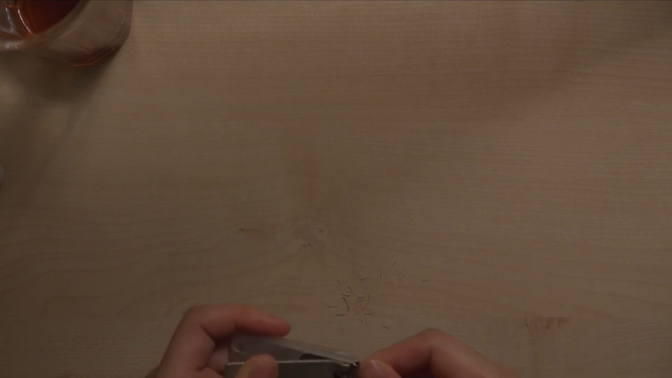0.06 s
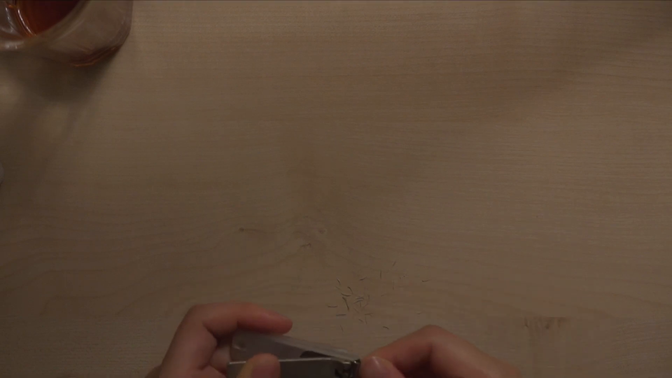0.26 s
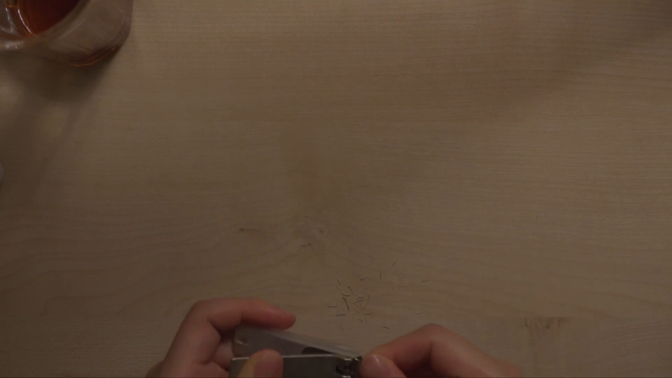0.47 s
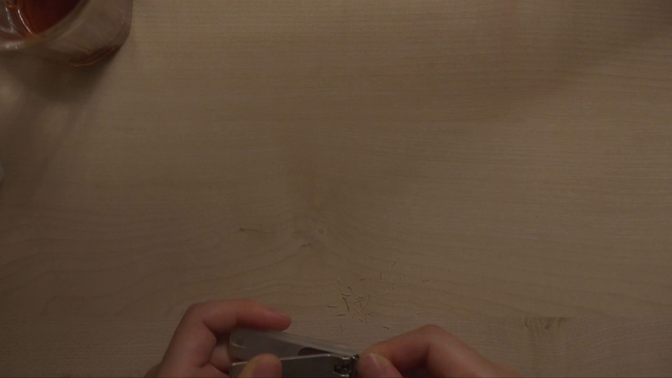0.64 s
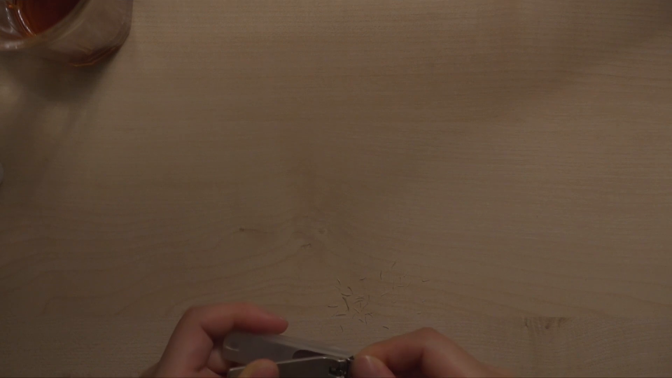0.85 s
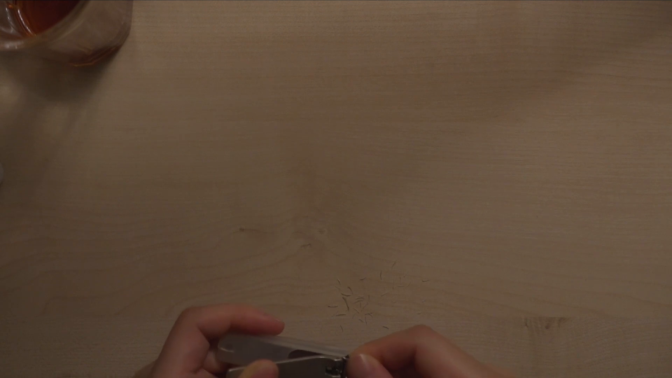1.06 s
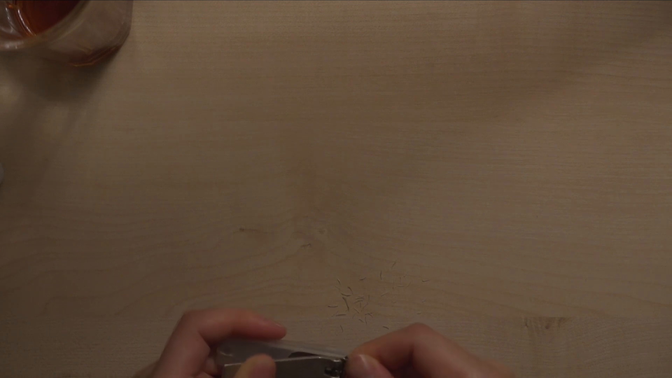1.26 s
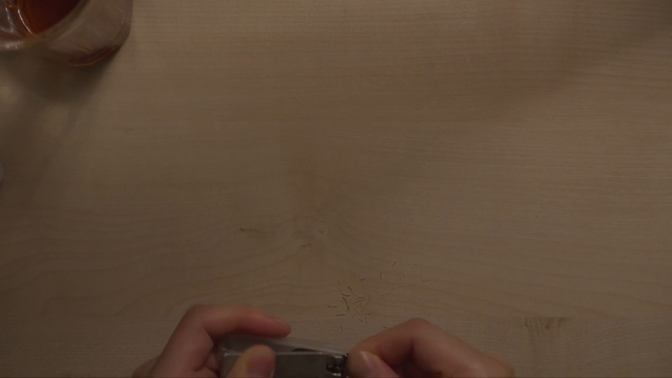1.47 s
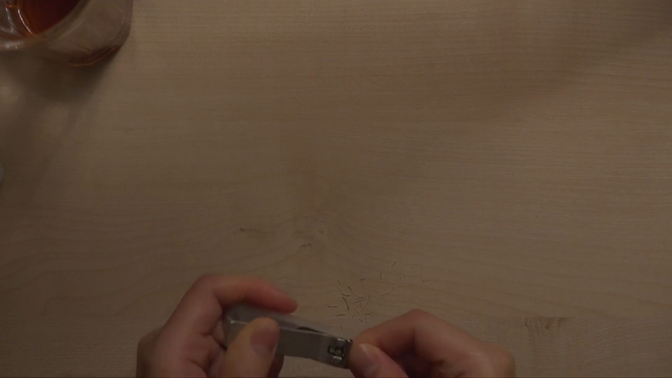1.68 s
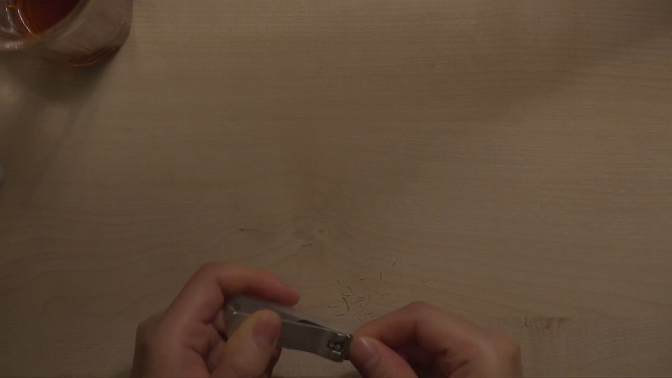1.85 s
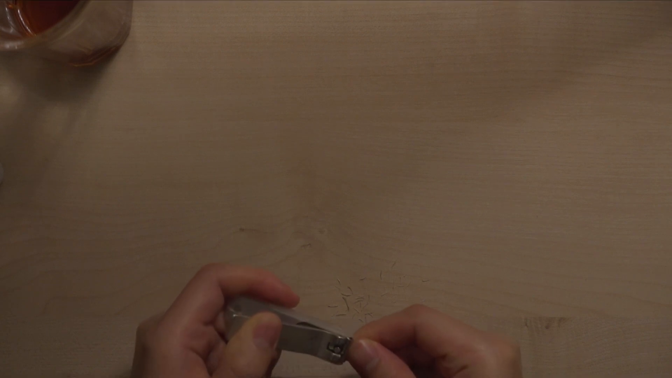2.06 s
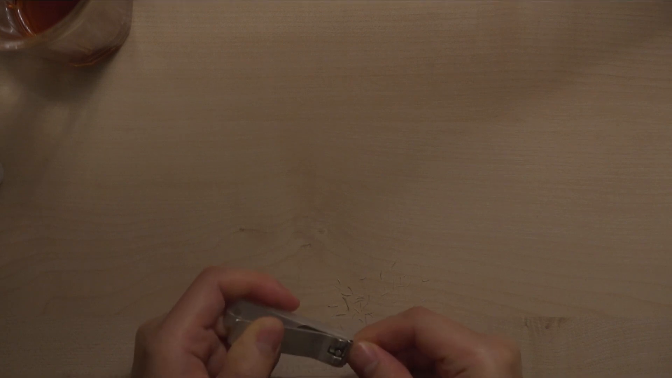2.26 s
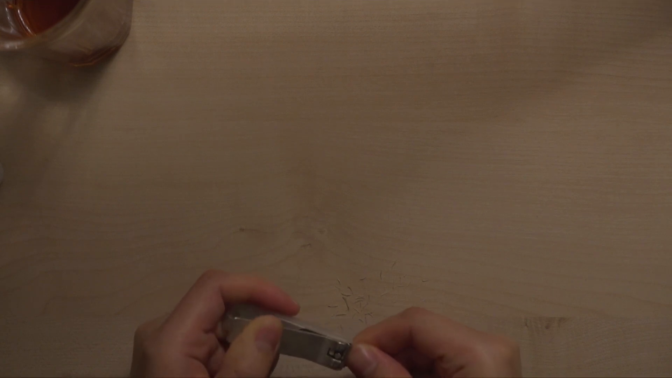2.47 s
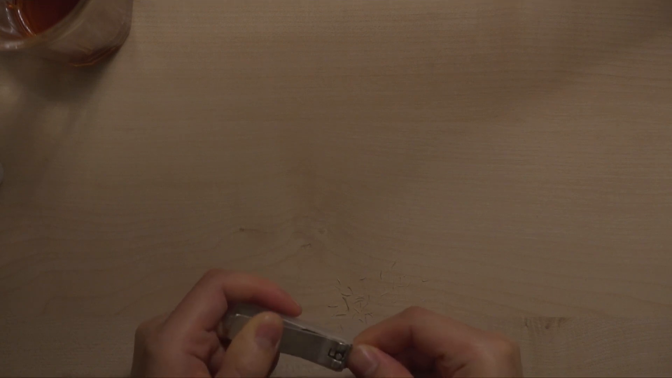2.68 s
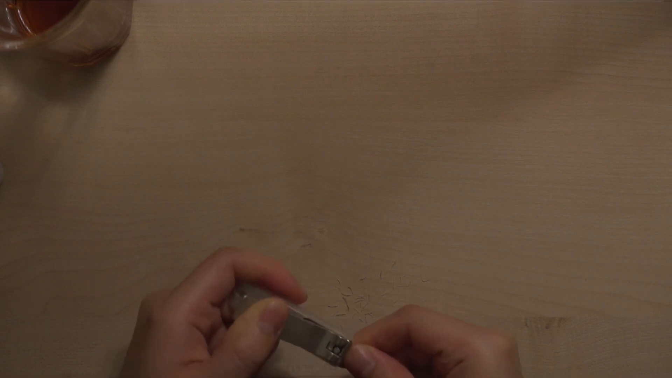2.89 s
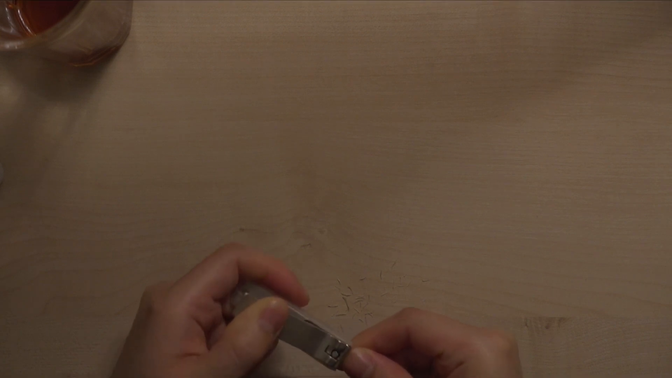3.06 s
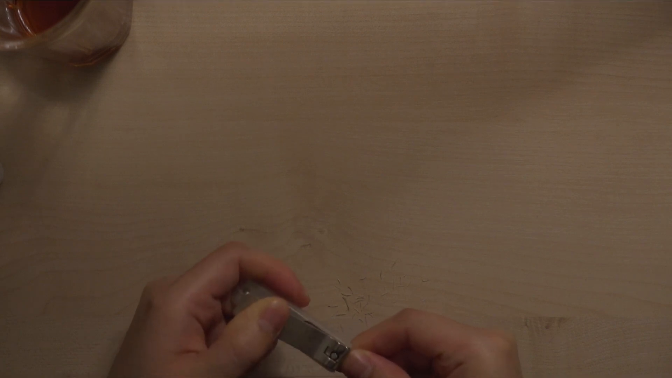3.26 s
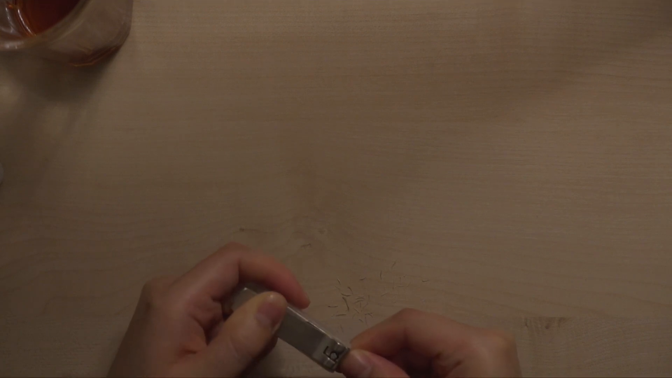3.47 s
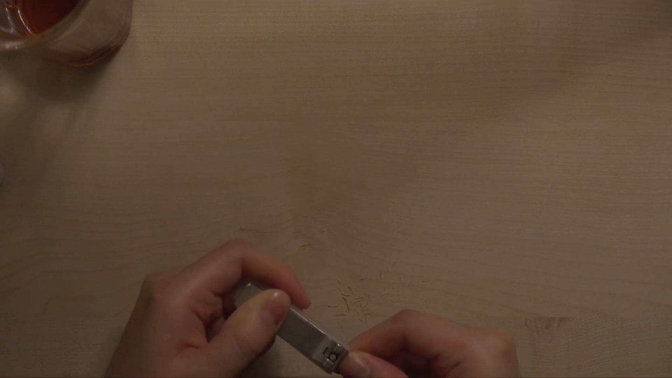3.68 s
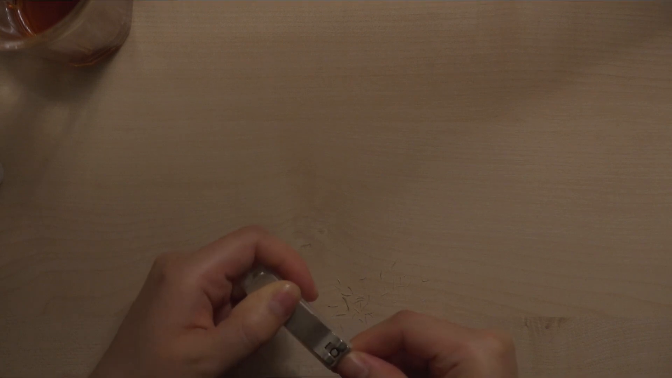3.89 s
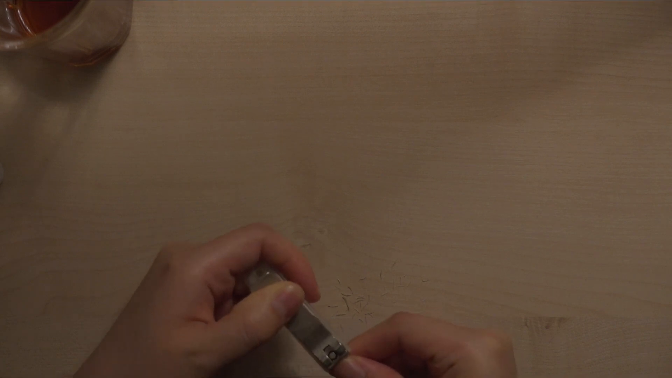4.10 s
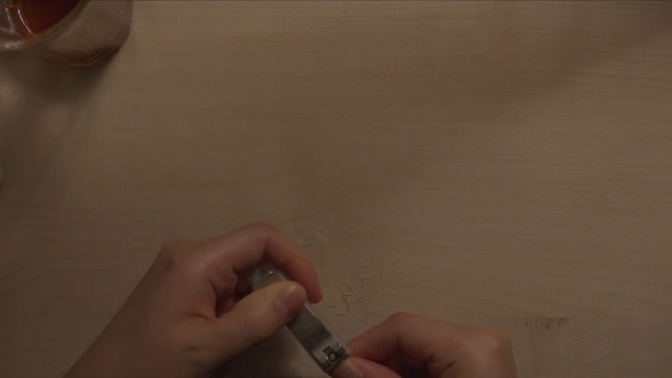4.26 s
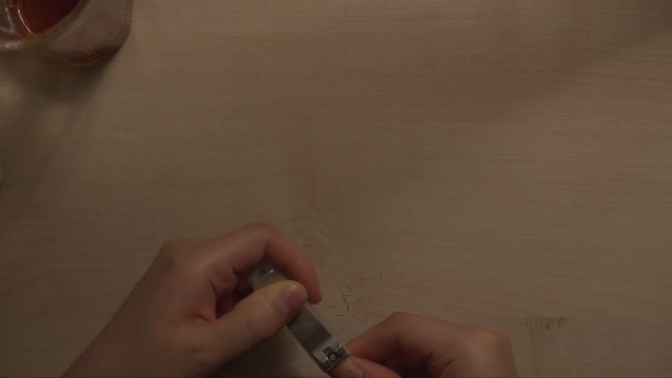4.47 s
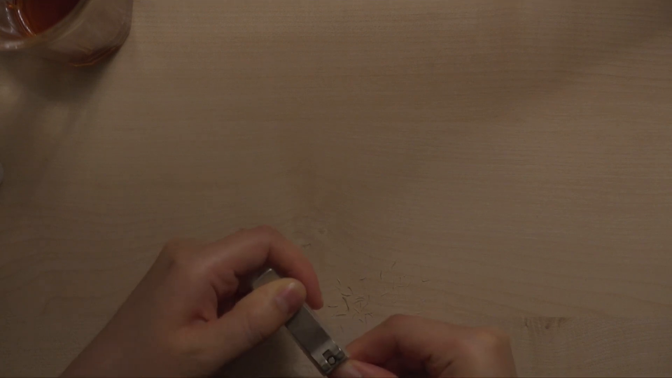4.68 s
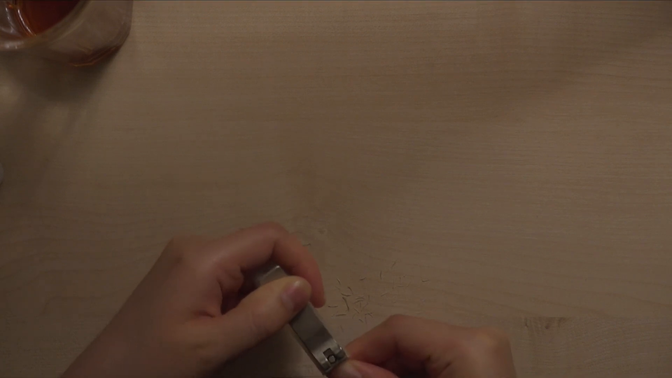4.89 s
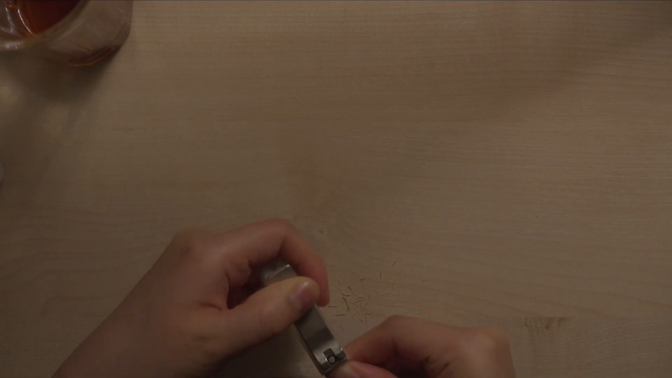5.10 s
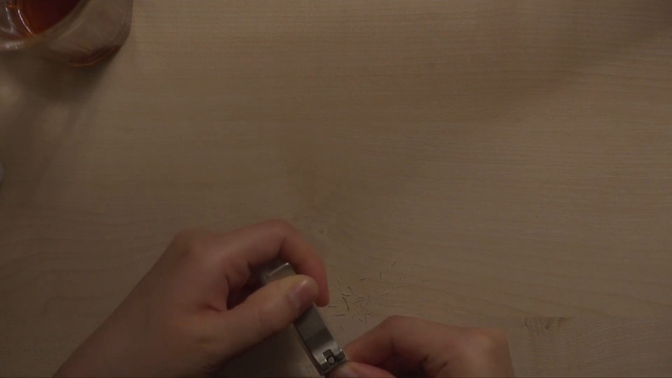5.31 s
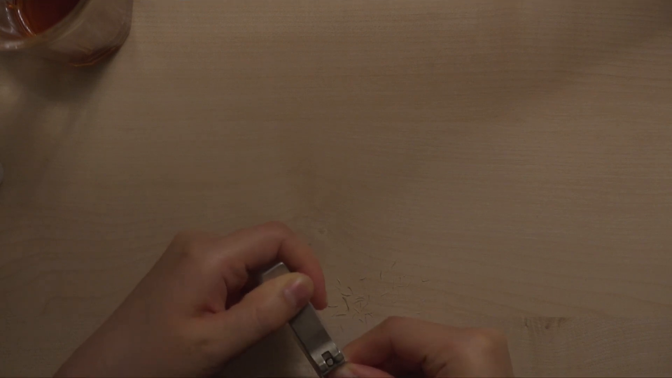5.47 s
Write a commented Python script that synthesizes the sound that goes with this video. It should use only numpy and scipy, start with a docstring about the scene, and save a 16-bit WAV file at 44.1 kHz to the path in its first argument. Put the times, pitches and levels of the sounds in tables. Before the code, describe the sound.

A steel nail clipper snaps four times, sharp and close, with a bright half-second room ring after each, over faint ventilation hush.

```python
"""A soft ventilation rush, third-octave noise bands with wavering levels, runs throughout.
Over it a steel nail clipper snaps four times, close by, above a wooden table, from 1.4 s to 4.7 s.
Faint lever ticks and jaw touches, ringing or bare clicks, fall between the snaps.
Each snap: a 2 ms crack, a click with splinter noise through the clipper's rings, plus a dull table knock; then
early echoes and diffuse reverberation, thickened from 11 ms by the hard walls, ringing for half a second.
The recorder's limiter ducks each crack, so the room seems to swell in after it."""
import sys
import numpy as np
from scipy import signal
from scipy.io import wavfile
from scipy.ndimage import uniform_filter1d, minimum_filter1d

SR = 44100
rng = np.random.default_rng(int(sys.argv[2]) if len(sys.argv) > 2 else 0)


def to_linear_factor(level_db):
    """Convert decibel levels (scalar or array-like) to linear amplitude factors."""
    exponent = np.asarray(level_db, float) / 20
    return 10 ** exponent


def output_pcm(signal):
    """Save a mono or channel-first signal as 16-bit PCM at the path in sys.argv[1].

    Samples are clipped to [-1, 1] before scaling.
    """
    pcm = np.clip(np.atleast_2d(signal).T, -1, 1) * 32767
    wavfile.write(sys.argv[1], SR, np.round(pcm).astype(np.int16))


N = 244314

# Ventilation spectrum, relative density: (frequency [Hz], level [dB])
RUSH_SPECTRUM = [(15, -70), (25, -32), (59, -26), (148, -24), (178, -21.5), (305, -7.5), (410, -1),
                 (552, -2.5), (666, -1.5), (919, -5), (1050, -6.5), (2300, -10), (3340, -14.5),
                 (14300, -22.5), (15500, -33)]
# Faint resonances of the rush: (frequency [Hz], nominal width [Hz], gain [dB])
RUSH_RESONANCES = [(660, 89, 1), (916, 39, 3.5), (1448, 47, 4), (2210, 320, 3.5)]
# Left-right correlation of the rush: (frequency [Hz], correlation [-1..1])
RUSH_CORRELATION = [(40, 0.92), (130, 0.76), (300, 0.9847), (640, 0.84), (1400, 0.23), (3100, 0.029),
                    (8000, 0.11)]
# Reverberation time of the room: (frequency [Hz], T60 [s])
ROOM_T60 = [(1000, 0.22), (2500, 0.63), (5000, 0.53), (8000, 0.53), (12000, 0.42), (16000, 0.38)]
# Left-right correlation of the reverberation: (frequency [Hz], correlation [-1..1])
ROOM_CORRELATION = [(1000, .85), (1500, .78), (2200, .45), (3100, .09), (6800, -.18), (12000, .05)]
# First echoes from table, ceiling and walls: (delay [s], level [dB], left-right difference [dB])
EARLY_ECHOES = [(.00055, -13, 0), (.0046, -29, 1), (.0109, -25.5, 0), (.0150, -29, -4), (.0192, -31, 2),
                (.0240, -31, 0)]
# Peaks and dips of the hand-damped clipper: (frequency [Hz], nominal width [Hz], gain [dB])
CLIPPER_RINGS = [(1920, 2100, -7), (2420, 770, 8), (3460, 4400, -2), (4674, 890, 12), (5240, 540, -4.5),
                 (6730, 2510, 13.5), (7350, 1180, -6.5), (12590, 6340, 8), (15500, 490, 1),
                 (15140, 620, 4.5)]
# Lever ticks: (time [s], level [dB])
LEVER_TICKS = [(1.8862, -54), (2.1172, -50)]
# Light contacts of jaws and nail: (time [s], click level before clipper colour [dB])
JAW_TOUCHES = [(2.1560, -55), (3.5601, -51)]
# Equally hard snaps: (time [s], table knock [dB], low ring [dB], high ring [dB], left-right difference [dB])
SNAP_EVENTS = [(1.4045, -11.5, 2.5, -0.5, 3.5), (2.5885, -12, -0.5, 2, -2), (3.5744, -20, -4.5, 2, 0),
               (4.7425, -6, -3, 1.5, -0.5)]

BAND_EDGES_HZ = 20 * 2 ** np.arange(0, 10, 1 / 3)
RUSH_DB = -63.5
DIFFUSE_DB, WALLS_DB = -38, -40.5  # before the clipper's colour and CRACK_GAIN_DB
WALLS_S, BUILD_S = .0108, .0015
TICK_HZ, TICK_WIDTH_HZ = 3250, 200
CRACK_GAIN_DB = 9
LEFT_LOUDER_DB = 0.84
HALF_SPLIT = np.array([[.5], [-.5]])  # shares a left-right difference in dB between the channels
TOP_HZ, CEILING_DB, RELEASE_S, LOOKAHEAD_S = 16120, -12.6, .019, .0006


def at_hz(points, hz):
    """Interpolates a spectrum table on a log-frequency axis."""
    table_hz, values = np.transpose(points)
    return np.interp(np.log(hz), np.log(table_hz), values)


def resonate(x, hz, width_hz):
    """Two-pole resonance, about unity gain at its peak."""
    r = np.exp(-np.pi * width_hz / SR)
    numerator = [(1 - r * r) / 2, 0, (r * r - 1) / 2]
    return signal.lfilter(numerator, [1, -2 * r * np.cos(2 * np.pi * hz / SR), r * r], x)


def colour(x, peaks):
    """Adds resonances in series: positive gain makes a peak, negative a dip."""
    for hz, width_hz, db in peaks:
        x = x + (to_linear_factor(db) - 1) * resonate(x, hz, width_hz * to_linear_factor(-db / 2))
    return x


def drift(rate_hz):
    """Slow random variation, spread 1: noise through two equal low-pass poles."""
    r = np.exp(-80 * np.pi * rate_hz / SR)  # computed at SR / 40
    noise = rng.standard_normal(N // 40 + 2002)
    slow = signal.lfilter([1], [1, -2 * r, r * r], noise)[2000:]  # start-up discarded
    return np.interp(np.arange(N) / 40, np.arange(len(slow)), slow / slow.std())


def diffuse_bands(correlation, size):
    """Yields third-octave stereo noise; the mid/side balance sets each band's correlation."""
    white = rng.standard_normal((2, 2, size))
    for k, (low, high) in enumerate(zip(BAND_EDGES_HZ, BAND_EDGES_HZ[1:])):
        band_pass = signal.butter(2, [low, high], "band", fs=SR, output="sos")
        mid, side = signal.sosfilt(band_pass, white[k % 2])  # neighbours use different noise
        hz = np.sqrt(low * high)
        alike = at_hz(correlation, hz)
        yield hz, np.sqrt((1 + alike) / 2) * mid + np.sqrt((1 - alike) / 2) * side * [[1], [-1]]


def rush(patchy_db=0.62, flicker_db=1.27):
    """Distant air rush: diffuse noise whose bands waver independently, slowly and fast."""
    out = np.zeros((2, N))
    for hz, band in diffuse_bands(RUSH_CORRELATION, N):
        waver_db = patchy_db * drift(2.5) + flicker_db * drift(12.0)
        out += to_linear_factor(at_hz(RUSH_SPECTRUM, hz) + waver_db) * band
    out = colour(out, RUSH_RESONANCES)
    return out / out.std() * to_linear_factor(RUSH_DB)


def reverberation(size):
    """Diffuse noise from 1 ms on, thickened from 11 ms by the walls; each band dies at its own T60."""
    t = np.arange(size) / SR
    tail = np.zeros((2, size))
    for hz, band in diffuse_bands(ROOM_CORRELATION, size):
        tail += band * to_linear_factor(-60 * t / at_hz(ROOM_T60, hz))
    diffuse = to_linear_factor(DIFFUSE_DB) * (t > .001)
    walls = to_linear_factor(WALLS_DB) * (1 - np.exp(-np.maximum(t - WALLS_S, 0) / BUILD_S))
    return tail * (diffuse + walls)


def jaws(x, low_db, high_db):
    """Small steel body: radiates no bass, colours a click by its damped rings; two vary with the grip."""
    x = signal.sosfilt(signal.butter(5, 1620, "high", fs=SR, output="sos"), x)
    grip_rings = [(3200, 700, low_db), (10300, 2000, high_db)]  # (frequency [Hz], nominal width [Hz], gain [dB])
    return colour(x, CLIPPER_RINGS + grip_rings)


def burst(splinter_db, splinter_s):
    """Hard unit click, then exponentially dying noise as the nail splinters."""
    decay = np.exp(-np.arange(400) / SR / splinter_s)
    out = to_linear_factor(splinter_db) * rng.standard_normal(400) * decay
    out[0] = 1
    return out


def ticks():
    """Tiny contacts: the lever rings briefly at two cascaded resonances, the jaws click."""
    lever, touches = np.zeros(N), np.zeros(N)
    impulse = np.eye(1, 400)[0]
    ring = resonate(resonate(impulse, TICK_HZ, TICK_WIDTH_HZ), TICK_HZ, 6 * TICK_WIDTH_HZ)
    ring = ring / np.abs(ring).max()
    for time_s, db in LEVER_TICKS:
        at = round(time_s * SR)
        lever[at:at + 400] += to_linear_factor(db) * ring
    for time_s, db in JAW_TOUCHES:
        at = round(time_s * SR)
        touches[at:at + 400] += to_linear_factor(db) * burst(splinter_db=-12, splinter_s=.001)
    return lever + jaws(touches + 1e-18, low_db=8, high_db=-3)  # tiny inaudible offset


def knock(hz=420, decay_s=0.00063, rise_s=0.00021):
    """Jolt through the hand into the table: a short, dull, damped push."""
    t = np.arange(600) / SR
    return np.cos(2 * np.pi * hz * t) * np.exp(-t / decay_s) * (1 - np.exp(-t / rise_s))


def snaps(same_room=.4):
    """Crack, echoes and tail through the clipper's rings; moving hands renew part of each tail."""
    size = int(.7 * SR)
    out = np.zeros((2, N + SR))
    shared = reverberation(size)
    for time_s, knock_db, low_db, high_db, pan_db in SNAP_EVENTS:
        paths = np.sqrt(same_room) * shared + np.sqrt(1 - same_room) * reverberation(size)
        side = to_linear_factor(HALF_SPLIT * pan_db)
        paths[:, :400] += burst(splinter_db=-19, splinter_s=.001) * side
        for delay_s, db, echo_pan_db in EARLY_ECHOES:
            smeared = burst(splinter_db=-6, splinter_s=.0008)  # rough surfaces scatter each echo
            at = round(delay_s * SR)
            paths[:, at:at + 400] += to_linear_factor(db + HALF_SPLIT * echo_pan_db) * smeared
        heard = to_linear_factor(CRACK_GAIN_DB) * jaws(paths, low_db, high_db)
        heard[:, :600] += to_linear_factor(knock_db) * knock() * side  # direct only, no room
        start = round(time_s * SR)
        out[:, start:start + size] += heard
    return out[:, :N]


def scene():
    """Clipper and room over the rush; the left microphone is slightly more sensitive."""
    mix = snaps() + ticks() + rush()
    return mix * to_linear_factor(HALF_SPLIT * LEFT_LOUDER_DB)


def top_cut(x):
    """Nothing passes above the cut-off."""
    return signal.sosfilt(signal.butter(12, 17110, fs=SR, output="sos"), x)


def record(dry):
    """Cuts the top; a look-ahead limiter ducks both channels at peaks, releasing exponentially."""
    dry = signal.sosfilt(signal.cheby2(18, 55, TOP_HZ, fs=SR, output="sos"), dry)
    peak_db = 20 * np.log10(np.abs(dry).max(axis=0) + 1e-9)
    over_db = np.maximum(peak_db - CEILING_DB, 1e-6)
    # running maximum with exponential decay, taken in the log domain
    fall = np.arange(N) / (RELEASE_S * SR)
    held_db = np.exp(np.maximum.accumulate(np.log(over_db) + fall) - fall)
    ahead = max(round(LOOKAHEAD_S * SR), 1)
    early_db = -minimum_filter1d(-held_db, size=2 * ahead + 1)  # ducks before the peak arrives
    duck_db = uniform_filter1d(early_db, size=ahead)
    mix = dry * to_linear_factor(-duck_db)
    return top_cut(mix)


dry = scene()
out = record(dry)
output_pcm(out)
```